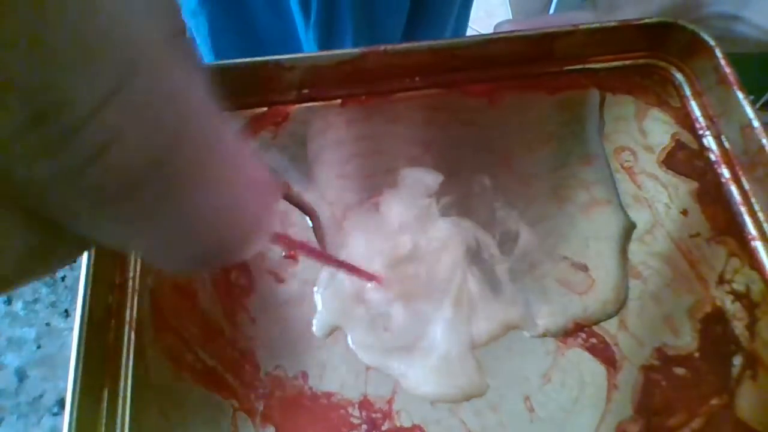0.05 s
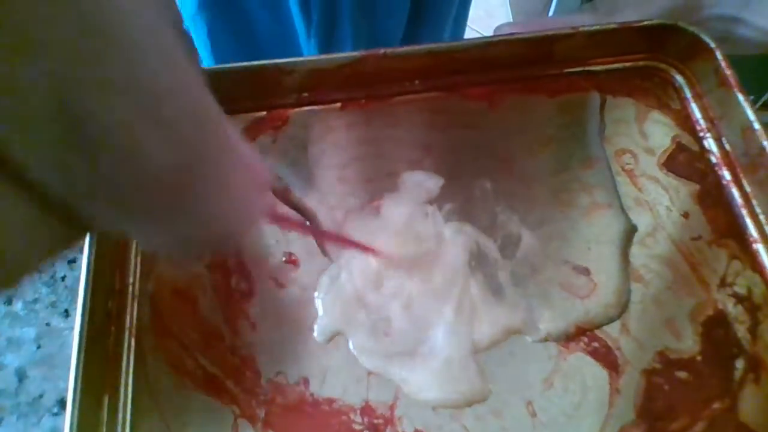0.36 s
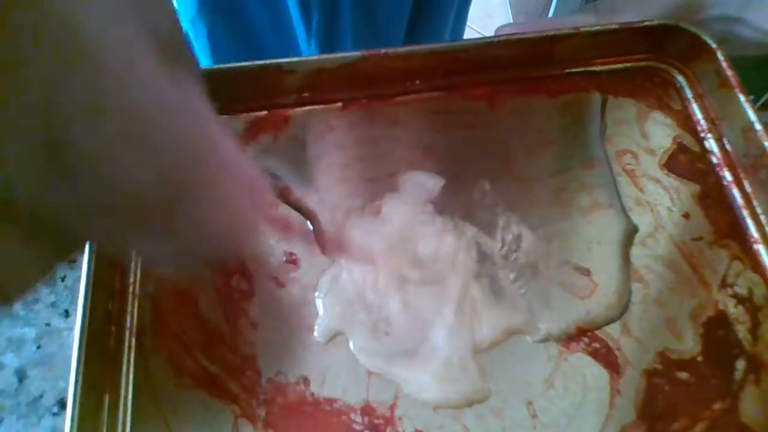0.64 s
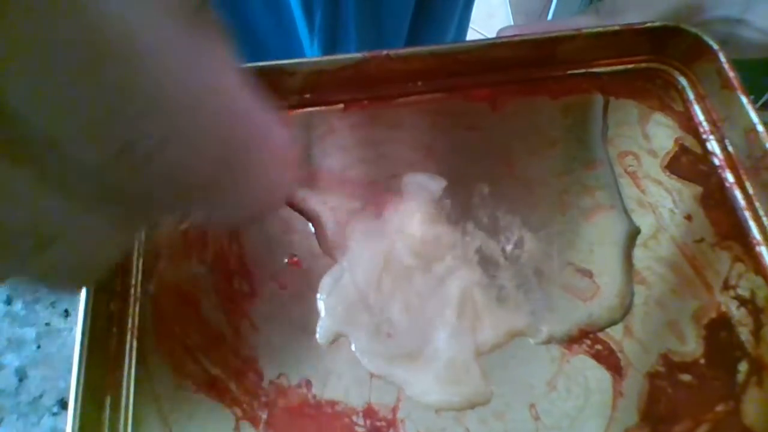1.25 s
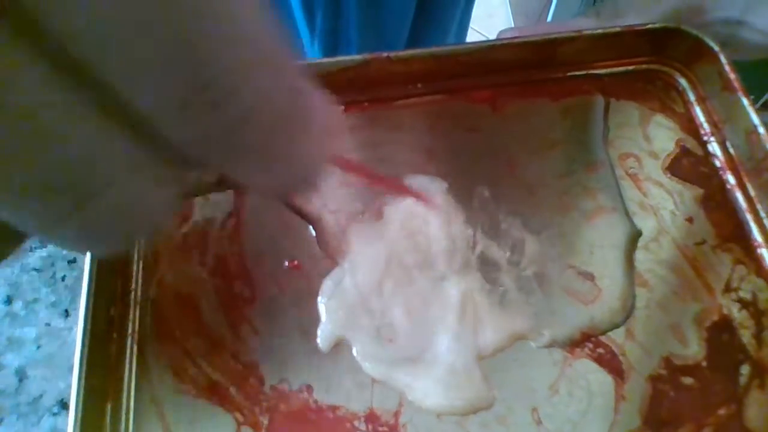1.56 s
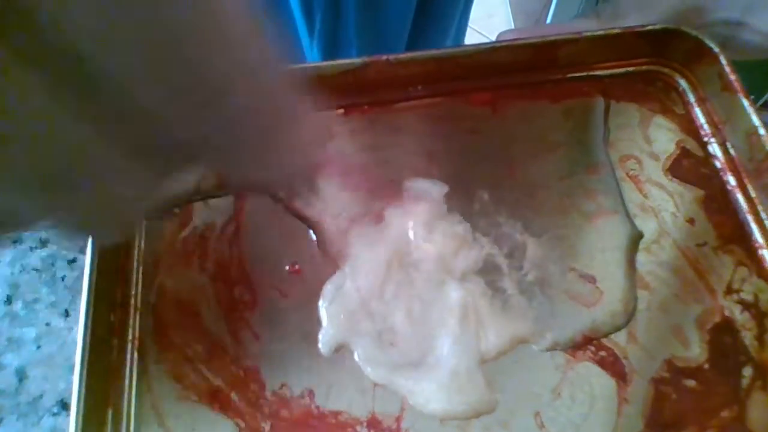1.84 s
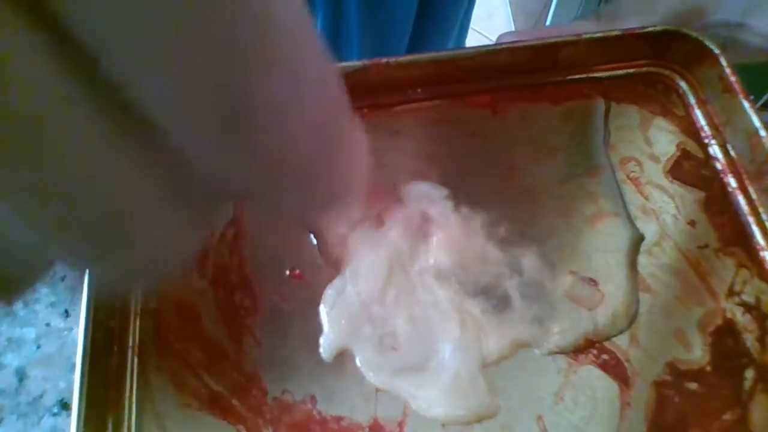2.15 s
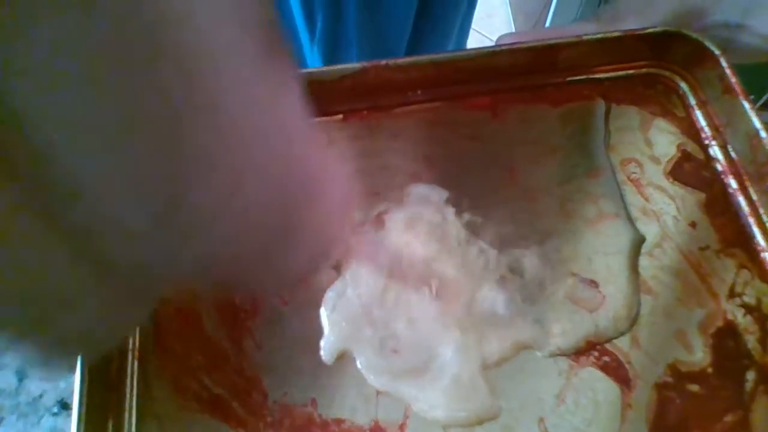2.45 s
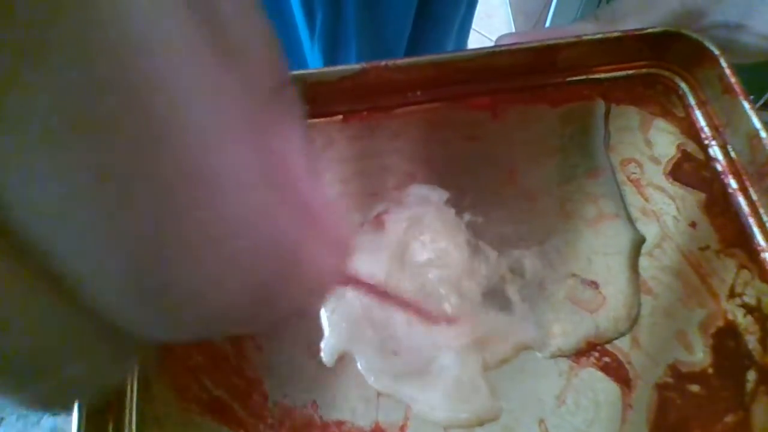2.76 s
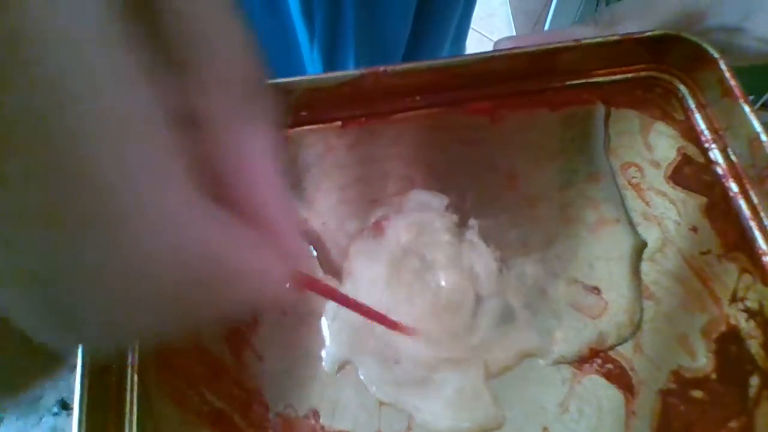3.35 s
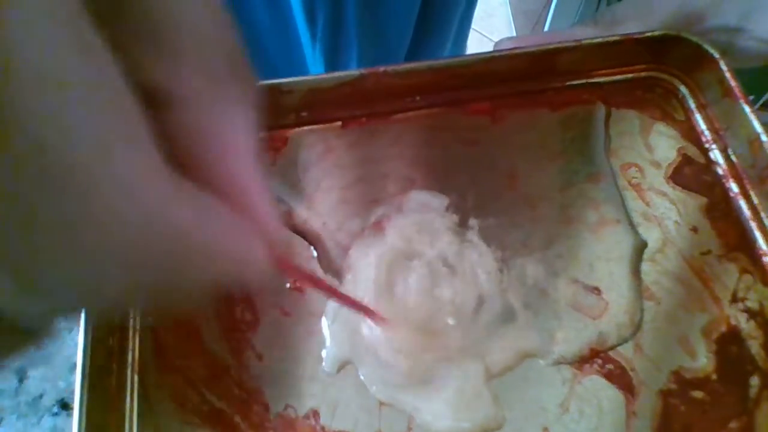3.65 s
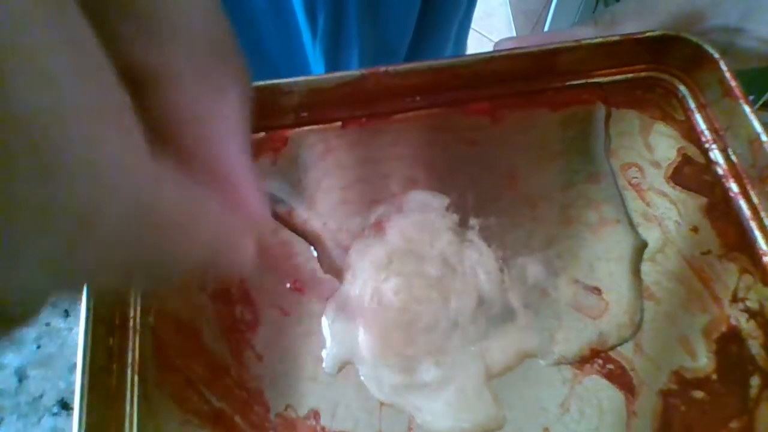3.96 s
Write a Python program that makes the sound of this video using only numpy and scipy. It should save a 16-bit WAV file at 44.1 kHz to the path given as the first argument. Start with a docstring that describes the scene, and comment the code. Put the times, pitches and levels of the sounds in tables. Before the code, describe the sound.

A thin stick stirs goo on a metal tray, close up in a quiet room. Light sticky crackling runs between short, irregular rasps against the metal, with small squelches and faint dull knocks from the flexing tray.

```python
"""Sticky crackle and short rasps, close up in a quiet room: a thin stick stirs goo on a metal tray.
The tip sticks and slips. Hard digs reach the metal, soft smears drag through the goo; both ring stick
and tray. Tearing goo rings air pockets, which squelch and pop. Under the pressure the tray floor
flexes with dull low notes. Faint hiss and mains hum lie beneath."""
import sys
import numpy as np
from scipy import signal
from scipy.fft import rfft, irfft
from scipy.io import wavfile
from scipy.ndimage import uniform_filter1d, map_coordinates

SR = 44100
rng = np.random.default_rng(int(sys.argv[2]) if len(sys.argv) > 2 else 0)


def generate_wav(signal):
    """Clip the signal to [-1, 1] and save it as 16-bit WAV at the path in sys.argv[1]."""
    frames = np.transpose(np.atleast_2d(signal))
    scaled = np.clip(frames, -1, 1) * 32767
    pcm = np.round(scaled).astype(np.int16)
    wavfile.write(sys.argv[1], SR, pcm)


N = 176400
T = np.arange(N) / SR
HZ = np.maximum(np.arange(N // 2 + 1) * SR / N, 1)
STROKE_N = 12288
STROKE_T = (np.arange(STROKE_N) - STROKE_N // 2) / SR
STROKE_HZ = np.maximum(np.arange(STROKE_N // 2 + 1) * SR / STROKE_N, 1)

# hard digs: peak t/s, level/dB, rise/s, fall/s, stick ring/dB, body/dB, treble/dB
DIGS = [(0.186, -40, 0.011, 0.024, 0, 4, -3.5), (0.453, -35, 0.03, 0.029, 0, -2.5, -6.5),
        (0.696, -45.5, 0.0066, 0.022, -1, 0, -7.5), (1.302, -51.5, 0.054, 0.039, 1, 1, -1),
        (1.837, -35, 0.026, 0.015, 4, -3.5, -9), (2.66, -41.5, 0.021, 0.018, 3.5, 4.5, -7.5),
        (2.941, -46, 0.015, 0.015, 1, -1, -5), (3.24, -43, 0.016, 0.015, 5, 0.5, -4),
        (3.52, -37.5, 0.02, 0.02, 8, -1, -5.5), (3.785, -33.5, 0.021, 0.014, 13.5, 1, -6.5)]
# soft smears: start t/s, length/s, level/dB, tip hollow first f/Hz, last f/Hz, treble/dB
SMEARS = [(0.077,0.073,-70.5,3930,4010,-1), (0.139,0.034,-56,4030,4080,-0.5),
          (0.235,0.024,-47,4020,4180,-3), (.29,.024,-53,3780,3820,0.5), (0.342,.054,-58,3900,3940,6.5),
          (0.484,0.046,-52.5,3560,3750,-3), (0.554,0.18,-57.5,3830,4120,2.5), (0.731,0.026,-57,4110,4230,7),
          (0.765,0.12,-60,4130,3650,3.5), (0.873,0.071,-57,4040,3800,3), (0.961,.12,-58,4200,3860,0.5),
          (1.193,.072,-62.5,4070,3990,3), (1.414,0.044,-61.5,3800,3840,-1), (1.476,.043,-55.5,3950,3800,5),
          (1.548,0.035,-53,4120,4290,1), (1.62,0.074,-55,4450,3800,1), (1.738,.073,-54,4090,4050,-2.5),
          (1.867,0.056,-56.5,4100,4190,8.5), (1.978,0.086,-55,4060,4080,-4.5),
          (2.062,0.092,-56.5,3990,4350,4), (2.311,0.028,-57,3930,4150,-5), (2.391,0.021,-52,4380,4220,3.5),
          (2.566,0.066,-67,3410,4260,-2.5), (2.693,0.073,-54.5,3390,4180,-7),
          (2.814,0.074,-60.5,4000,4220,-9.5), (2.982,0.031,-61,4150,4730,-8),
          (3.144,0.053,-60,4310,4100,-6.5), (3.268,0.067,-58.5,4260,4050,-4.5),
          (3.423,0.047,-61.5,4200,4350,0.5), (3.487,0.028,-47,4190,4290,-9),
          (3.544,0.033,-55.5,4200,4030,-16.5), (3.698,0.059,-62.5,3940,4300,-4),
          (3.814,0.031,-53.5,4180,3870,-11)]
# air pockets: start t/s, length/s, first f/Hz, last f/Hz, width/Hz, level/dB
AIR_POCKETS = [(0.726,0.1,2204,2104,70,-72.5), (1.509,0.034,1500,2050,1200,-68),
               (1.617,0.14,1830,2014,130,-76), (1.656,.065,3010,2830,600,-59.5),
               (1.606,0.18,950,1090,250,-80), (2.312,0.035,2670,1860,600,-69),
               (2.84,0.043,3800,3420,302,-61), (3.044,.028,4330,3540,630,-53),
               (3.048,0.022,2750,2100,500,-61.5), (3.681,.066,2760,2900,298,-60)]
# tray floor flexes: peak t/s, half length/s, low note level/dB, upper note level/dB
FLEXES = [(0.226, 0.024, -67.5, -87), (0.292, 0.02, -76, -63.5), (0.32, 0.019, -60.5, -71),
          (0.479, 0.066, -92, -67.5), (0.579, .022, -82, -64), (0.707, 0.016, -83, -59.5),
          (0.841, 0.02, -84, -70.5), (1.314, 0.039, -69.5, -69.5), (1.438, 0.032, -74.5, -70.5),
          (1.479, 0.023, -75.5, -69), (1.603, 0.046, -72.5, -91.5), (1.856, 0.025, -58, -63.5),
          (2.01, 0.037, -59.5, -76), (2.68, 0.019, -60.5, -85), (2.75, 0.041, -62.5, -79.5),
          (3.265, 0.038, -64.5, -72.5), (3.534, 0.02, -65, -55.5), (3.799, 0.02, -61, -81.5),
          (3.841, 0.019, -69.5, -68)]
# stick and tray modes: f/Hz, height/dB
MODES = [(1030, 14.5), (1230, 16), (1650, 2), (1965, 2.5), (2150, 10.5), (2745, 17.5), (3000, 8.5),
         (3335, 15.5), (3590, 5.5), (3805, 5.5), (3990, 9.5), (4315, 8), (4460, 9), (4695, -0.5),
         (5260, 15.5)]
# dig friction spectrum under the modes: f/Hz, level/dB
DIG_SPECTRUM = [(100, -39), (600, -36.5), (770, -32), (1150, -18.5), (1470, -26), (1850, -17), (2600, -9.5),
                (3100, -14.5), (4150, 2), (4650, -2), (4950, -12), (5700, -5.5), (6300, -3), (7000, -11),
                (7500, -17.5)]
# smear friction spectrum under the modes, for a hollow at SMEAR_REF_HZ: f/Hz, level/dB
SMEAR_SPECTRUM = [(100, -34.5), (350, -27.5), (650, -45), (900, -22), (1500, -30), (2400, -14),
                  (2750, -9.5), (3200, -7.5), (4100, 0), (4550, -0.5), (4900, -11), (5700, -9.5),
                  (6300, -7), (6800, -15.5), (7500, -20.5)]
# tray thud spectrum: f/Hz, level/dB
THUD_SPECTRUM = [(50, -39.5), (120, 10.5), (220, 21.0), (330, -35.5), (600, -16), (1500, -88.5)]
# background hiss spectrum: f/Hz, level/dB
HISS_SPECTRUM = [(30, -25), (70, -8), (400, -7.5), (700, -20.5), (2200, -22), (3000, -14.5), (4100, -5.5),
                 (5000, -23), (6300, -19), (7500, -27.5)]

MODE_WIDTH_HZ, SMEAR_REF_HZ = 62, 4040
STICK_HZ, STICK_WIDTH_HZ = 2750, 170
BODY_EDGE_HZ, TREBLE_EDGE_HZ = 3200, 5000
HOLLOW_DB, HOLLOW_WIDTH_HZ = 10, 220
COARSE_DB, COARSE_HZ = 2.4, 190  # spectral ripple per stroke
FINE_DB, FINE_HZ = 4.8, 115  # spectral ripple per contact point
CONTACT_S = .045


def digs():
    """The tip bites through to the metal in short rasps."""
    out, base_db = np.zeros(N), contour(DIG_SPECTRUM, STROKE_HZ)
    for at, db, rise, fall, ring_db, body_db, treble_db in DIGS:
        tone_db = base_db + stick_and_tray(ring_db, body_db, treble_db)
        rasp = friction(tone_db, slips_per_s=560, scatter_db=2.5, rub=0.3)
        add(out, rasp, undb(db) * swell(at, rise, fall, shape=1.65), at)
    return out


def smears(attack_s=0.013, release_s=0.0093):
    """The tip drags through the goo with a light crackle; its hollow glides as it opens or closes."""
    out = np.zeros(N)
    for start, length, db, first_hz, last_hz, treble_db in SMEARS:
        centre_hz = (first_hz + last_hz) / 2
        base_db = contour(SMEAR_SPECTRUM, STROKE_HZ * SMEAR_REF_HZ / centre_hz)
        tone_db = base_db + stick_and_tray(0, 0, treble_db)
        glide = ([-length / 2, length / 2], [first_hz, last_hz])
        crackle = friction(tone_db, slips_per_s=650, scatter_db=1.5, rub=0.45, hollow_glide=glide)
        fade = np.maximum(start - T, 0) / attack_s + np.maximum(T - start - length, 0) / release_s
        add(out, crackle, undb(db) * np.exp(-np.minimum(fade, 20)), start + length / 2)
    return out


def friction(tone_db, slips_per_s, scatter_db, rub, hollow_glide=None):
    """One stroke: irregular slips ring stick and tray; fine resonances change as the tip moves on."""
    slips = rng.random(STROKE_N) < slips_per_s / SR
    strength = undb(scatter_db * rng.standard_normal(STROKE_N))
    force = unit(slips * strength) + rub * rng.standard_normal(STROKE_N)
    stroke_db = tone_db + COARSE_DB * ripple(COARSE_HZ)
    sound = np.zeros(STROKE_N)
    for at in CONTACT_S * np.arange(-3, 4):
        hollow_db = HOLLOW_DB * peak(np.interp(at, *hollow_glide), HOLLOW_WIDTH_HZ) if hollow_glide else 0
        contact = np.clip(.5 + 2 * (.5 - np.abs(STROKE_T - at) / CONTACT_S), 0, 1)
        sound += colour(force * contact, stroke_db + hollow_db + FINE_DB * ripple(FINE_HZ))
    power = uniform_filter1d(sound ** 2, size=700, mode="wrap")
    return sound / np.sqrt(power)  # even hand pressure


def stick_and_tray(ring_db, body_db, treble_db):
    """Gain/dB of the modes, with trims for stick ring, body and treble."""
    modes_db = sum(db * peak(hz, MODE_WIDTH_HZ) for hz, db in MODES)
    stick = np.exp(-((STROKE_HZ - STICK_HZ) / STICK_WIDTH_HZ) ** 2)
    body = (1 - stick) / (1 + (STROKE_HZ / BODY_EDGE_HZ) ** 12)
    treble = 1 / (1 + (TREBLE_EDGE_HZ / STROKE_HZ) ** 24)
    return modes_db + ring_db * stick + body_db * body + treble_db * treble


def squelches(slips_per_s=700):
    """Tearing goo rings air pockets, which glide as they change shape; the shortest pop."""
    out = np.zeros(N)
    for start, length, first_hz, last_hz, width_hz, db in AIR_POCKETS:
        half = length / 2
        pitch_hz = np.interp(STROKE_T, [-half, half], [first_hz, last_hz])
        phase = 2 * np.pi * np.cumsum(pitch_hz) / SR
        slips = (rng.random(STROKE_N) < slips_per_s / SR) * rng.standard_normal(STROKE_N)
        pole = np.exp(-np.pi * width_hz / SR)
        baseband = signal.lfilter([1], np.poly([pole, pole]), slips * np.exp(-1j * phase))
        ring = (baseband * np.exp(1j * phase)).imag
        ring /= np.std(ring[np.abs(STROKE_T) < half])
        add(out, ring, undb(db) * swell(start + half, half, half, shape=7.0), start + half)
    return out


def tray_flexes(low_hz=171.3, upper_hz=486.7, thud_re_low_db=-20.5):
    """Two damped notes and a dull thud swell as the tray floor is pushed."""
    low, upper = tray_note(low_hz), tray_note(upper_hz)
    thud = undb(thud_re_low_db) * noise(THUD_SPECTRUM)
    out = np.zeros(N)
    for at, half, low_db, upper_db in FLEXES:
        flex = undb(low_db) * (low + thud) + undb(upper_db) * upper
        out += swell(at, half, half, shape=2.1) * flex
    return out


def tray_note(hz, wander_hz=6.8, roughness=0.44):
    """One tray floor note, unsteady in pitch and level."""
    phase = 2 * np.pi * np.cumsum(hz + wander_hz * drift(cutoff_hz=38)) / SR
    return np.sqrt(2) * np.sin(phase) * (1 + roughness * drift(cutoff_hz=46))


def reflections(x, t60_s, db):
    """Diffuse decaying tail, 2 ms behind the direct sound."""
    t = T[:SR // 2]
    tail = rng.standard_normal(len(t)) * undb(-60 * t / t60_s) * (t > .002)
    return undb(db) * signal.fftconvolve(x, tail / np.linalg.norm(tail))[:N]


def background(hiss_db=-76.5, hum_db=-90, hum_hz=49.3):
    """Faint hiss and mains hum."""
    hum = np.sqrt(2) * np.sin(2 * np.pi * hum_hz * T)
    return undb(hiss_db) * noise(HISS_SPECTRUM) + undb(hum_db) * hum


def undb(db):
    """dB to gain."""
    return np.exp(np.asarray(db) * np.log(10) / 20)


def unit(x):
    """Scale to rms 1."""
    return x / np.sqrt(np.mean(x ** 2))


def contour(points, at_hz=HZ):
    """Level/dB through spectrum points, over log f."""
    hz, db = np.array(points).T
    return np.interp(np.log(at_hz), np.log(hz), db)


def peak(hz, width_hz):
    """Resonance curve, height 1."""
    return 1 / (1 + (2 * (STROKE_HZ - hz) / width_hz) ** 2)


def ripple(spacing_hz):
    """Random spectral hills and dips, rms about 1."""
    heights = unit(rng.uniform(-1, 1, size=400))
    return map_coordinates(heights, [STROKE_HZ / spacing_hz], mode="mirror")


def colour(x, db):
    """Minimum-phase filter: peaks ring after each click."""
    n = len(x)
    cepstrum = irfft(db * np.log(10) / 20, n)
    cepstrum[1:n // 2] *= 2
    cepstrum[n // 2 + 1:] = 0
    return irfft(rfft(x) * np.exp(rfft(cepstrum)), n)


def noise(spectrum):
    """Shaped noise, rms 1."""
    return unit(colour(rng.standard_normal(N), contour(spectrum)))


def drift(cutoff_hz):
    """Low-passed noise, rms 1."""
    return unit(irfft(rfft(rng.standard_normal(N)) / (1 + (HZ / cutoff_hz) ** 4), N))


def swell(peak_s, rise_s, fall_s, shape):
    """Envelope, 10 dB down one rise before the peak and one fall after."""
    away = np.where(T < peak_s, (peak_s - T) / rise_s, (T - peak_s) / fall_s)
    gain, near = np.zeros(N), away < 10
    gain[near] = undb(-10 * away[near] ** shape)
    return gain


def add(out, sound, envelope, centre_s):
    """Mix in a centred stroke under its envelope."""
    index = int(centre_s * SR) - len(sound) // 2 + np.arange(len(sound))
    inside = (index >= 0) & (index < N)
    out[index[inside]] += sound[inside] * envelope[index[inside]]


def scene():
    """Scraping with rim and room reflections, tray flexes, background."""
    scrape = digs() + smears() + squelches()
    rim = reflections(scrape, t60_s=0.036, db=-3)
    room = reflections(scrape, t60_s=0.19, db=-10)
    return (scrape + rim + room + tray_flexes() + background())[None]


def record(dry, mic_top_hz=7560, hiss_db=-91.5, recorder_top_hz=15700):
    """The microphone cuts the treble steeply; the recorder adds very faint even hiss."""
    mic = signal.ellip(12, .2, 70, mic_top_hz, fs=SR, output="sos")
    recorder = signal.ellip(10, .2, 70, recorder_top_hz, fs=SR, output="sos")
    hiss = undb(hiss_db) * rng.standard_normal(N)
    return signal.sosfilt(recorder, signal.sosfilt(mic, dry) + hiss)


dry = scene()
out = record(dry)
generate_wav(out)
```